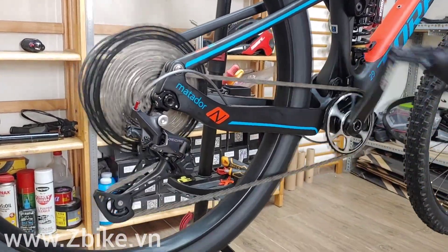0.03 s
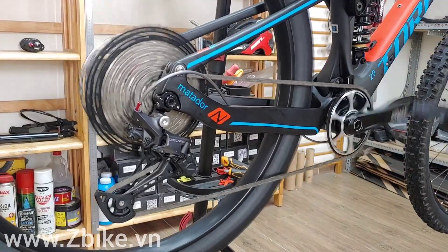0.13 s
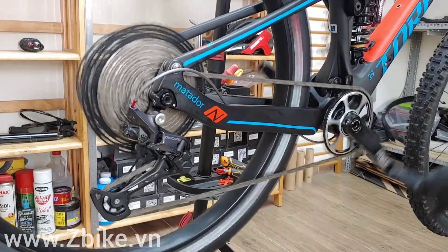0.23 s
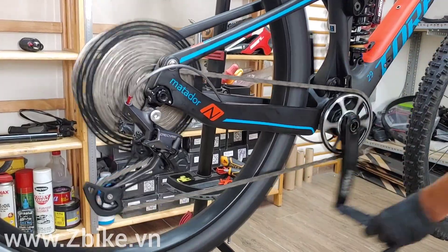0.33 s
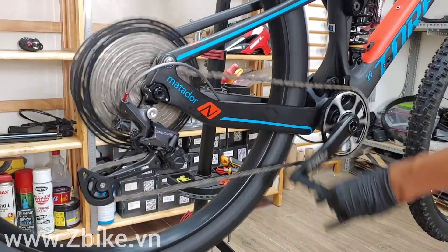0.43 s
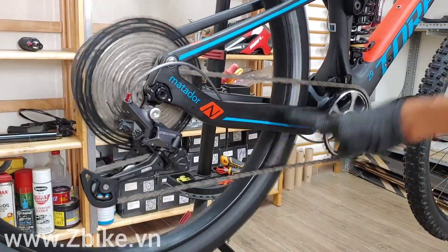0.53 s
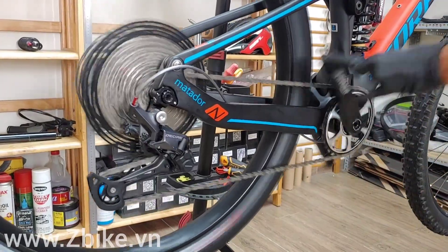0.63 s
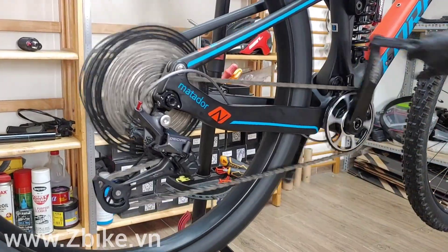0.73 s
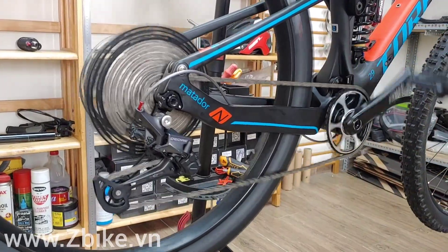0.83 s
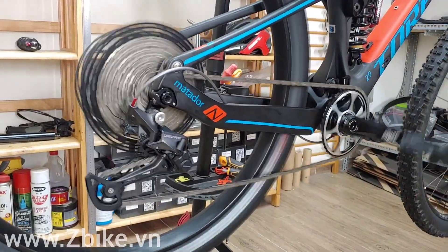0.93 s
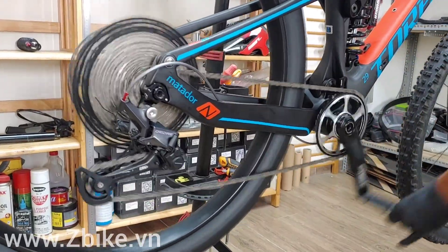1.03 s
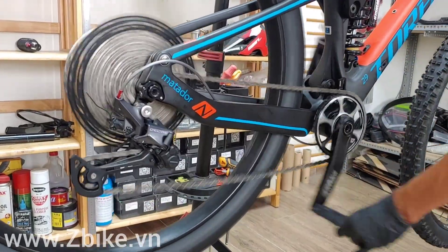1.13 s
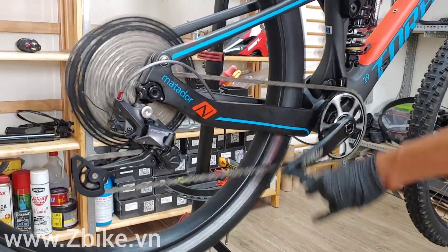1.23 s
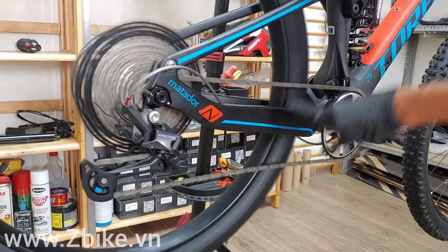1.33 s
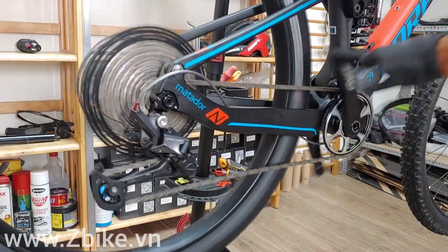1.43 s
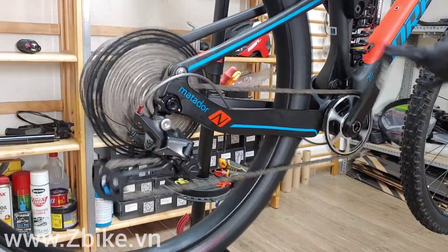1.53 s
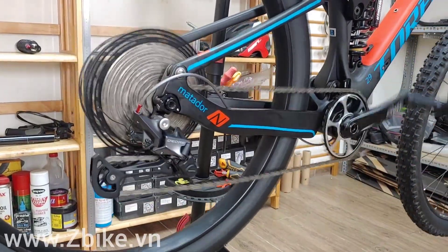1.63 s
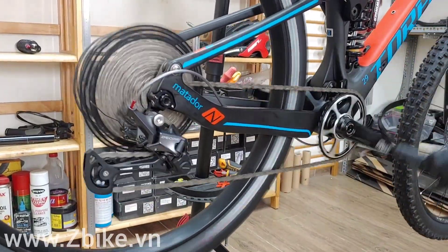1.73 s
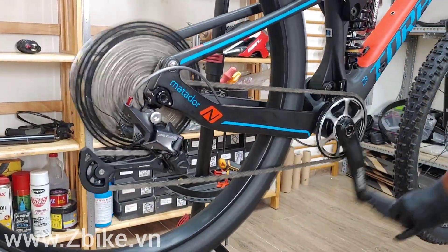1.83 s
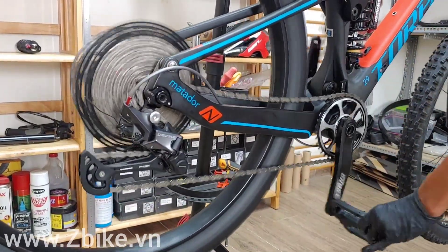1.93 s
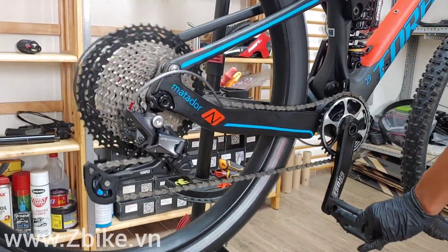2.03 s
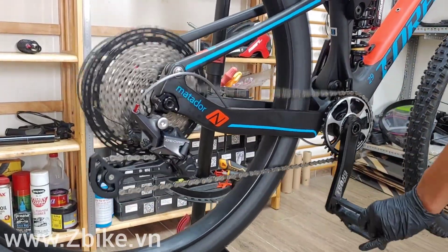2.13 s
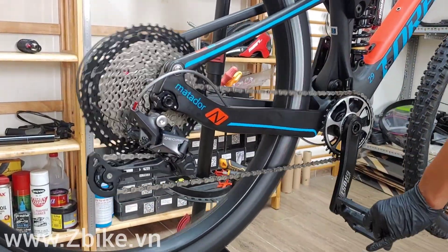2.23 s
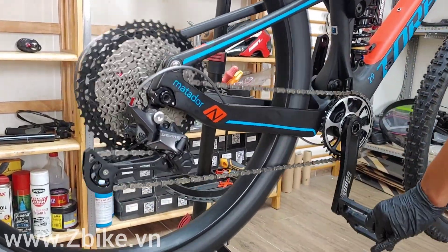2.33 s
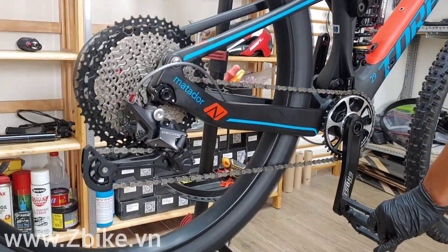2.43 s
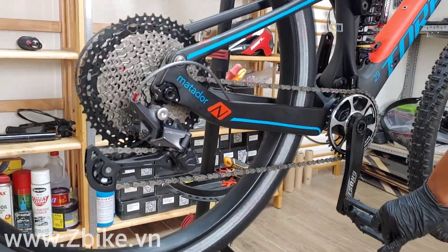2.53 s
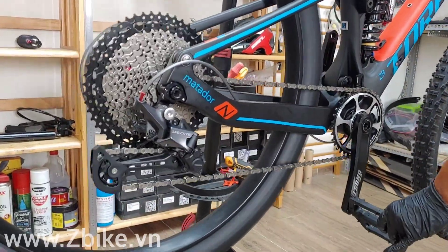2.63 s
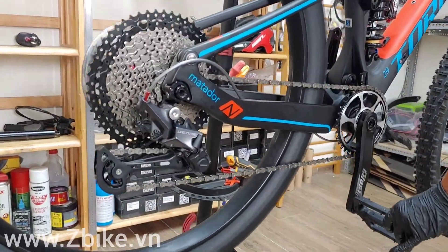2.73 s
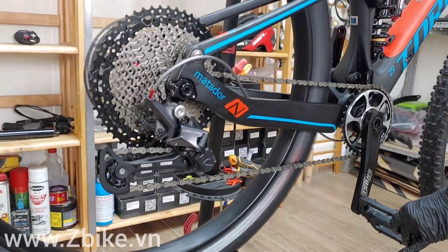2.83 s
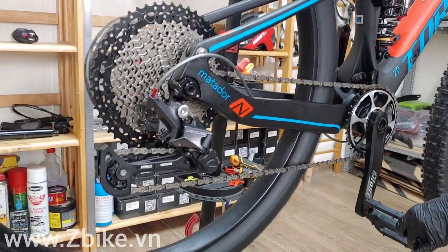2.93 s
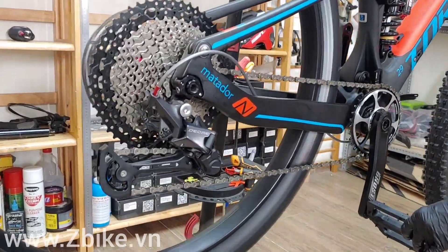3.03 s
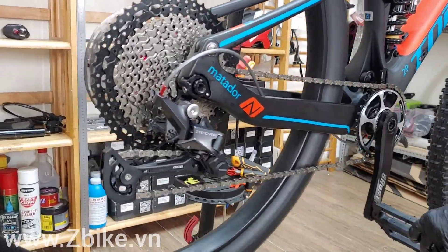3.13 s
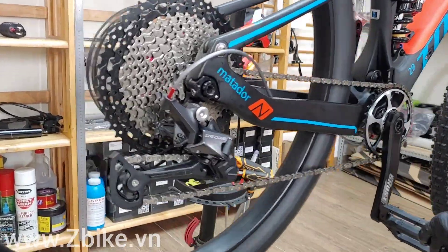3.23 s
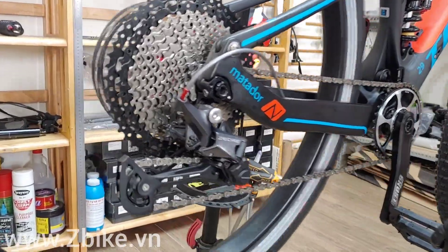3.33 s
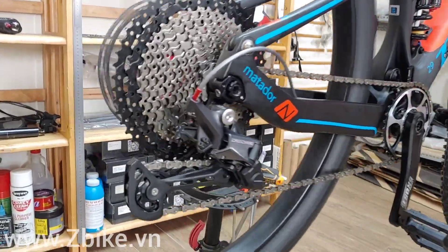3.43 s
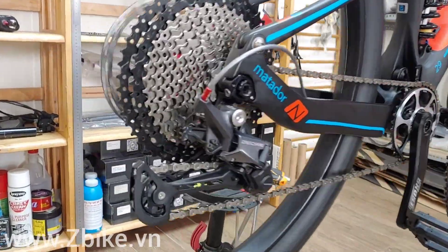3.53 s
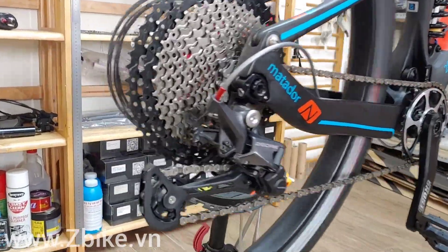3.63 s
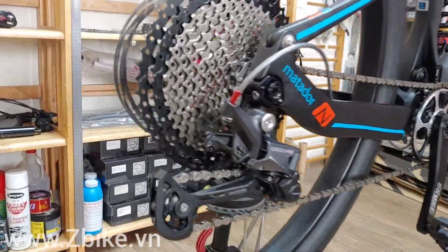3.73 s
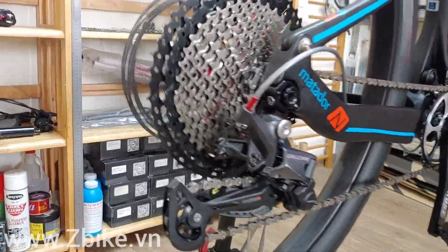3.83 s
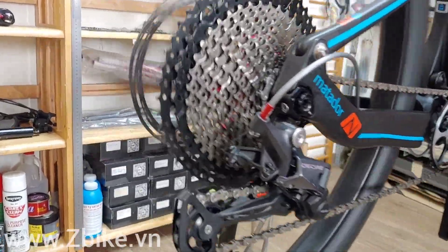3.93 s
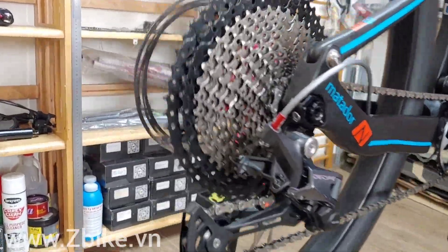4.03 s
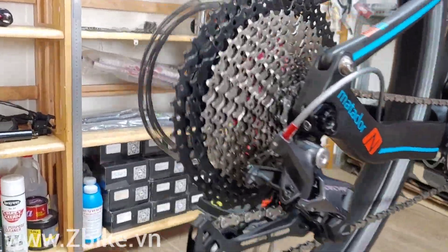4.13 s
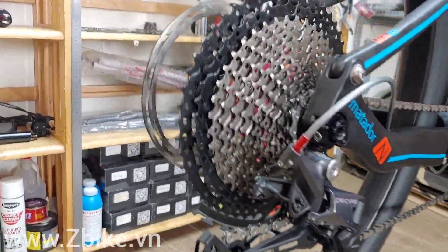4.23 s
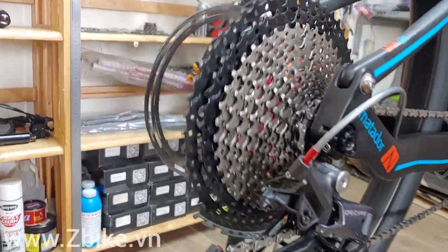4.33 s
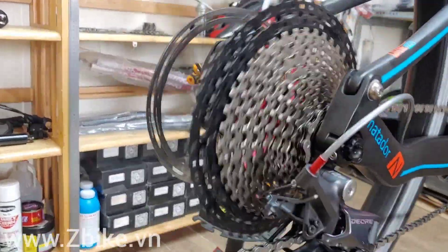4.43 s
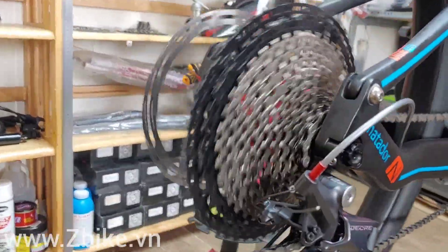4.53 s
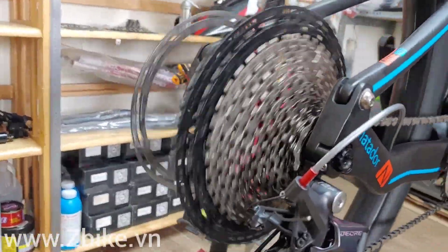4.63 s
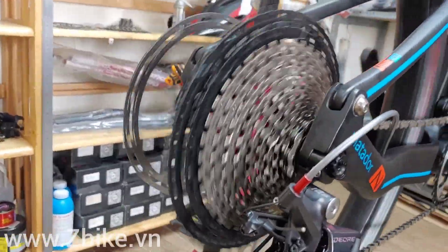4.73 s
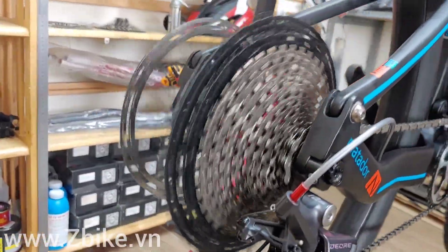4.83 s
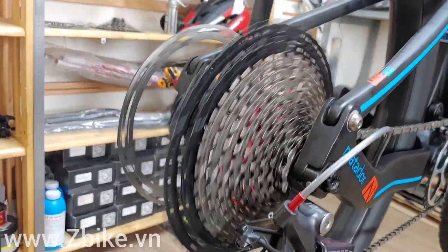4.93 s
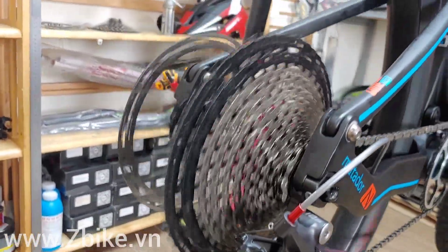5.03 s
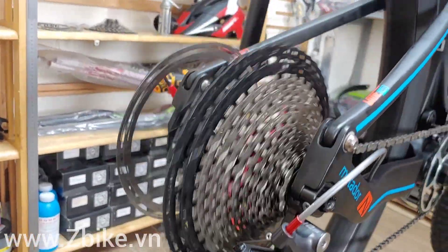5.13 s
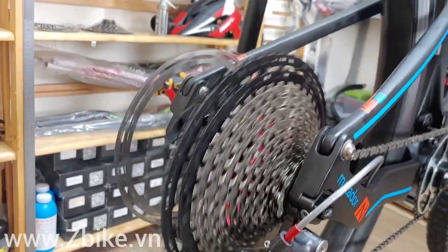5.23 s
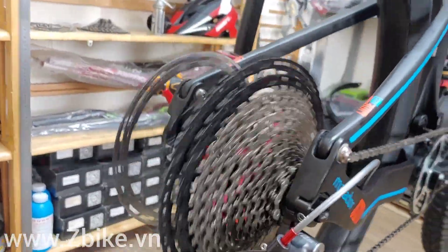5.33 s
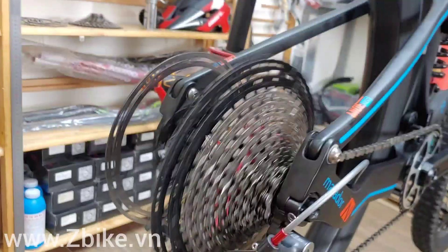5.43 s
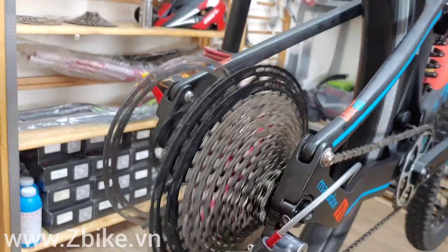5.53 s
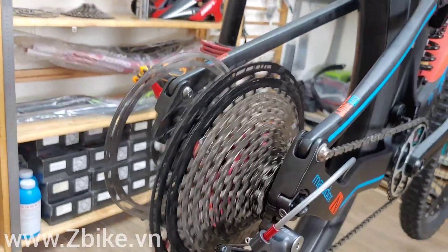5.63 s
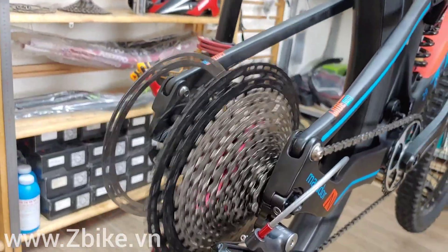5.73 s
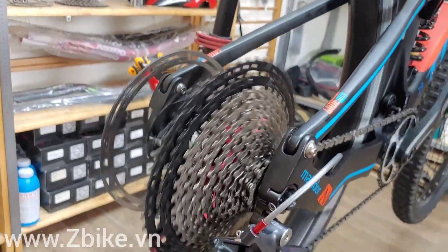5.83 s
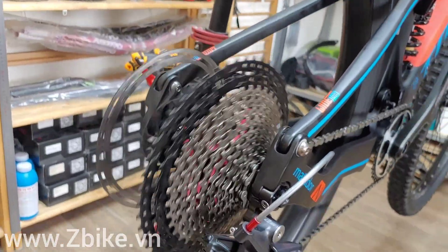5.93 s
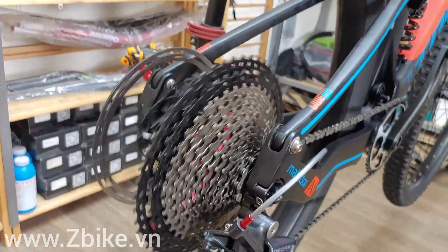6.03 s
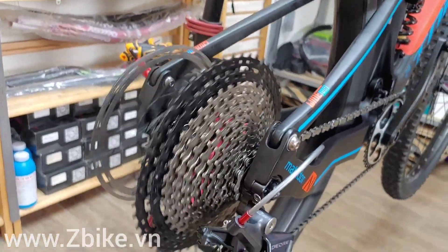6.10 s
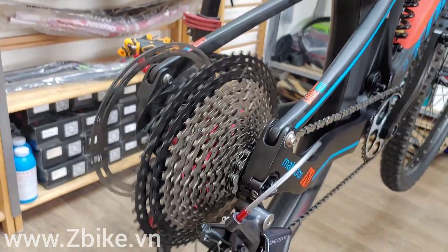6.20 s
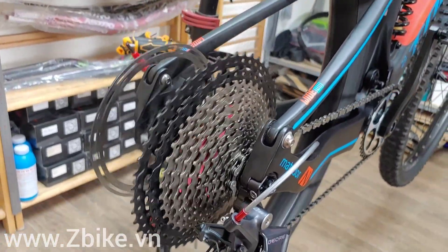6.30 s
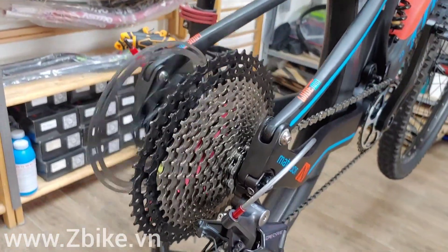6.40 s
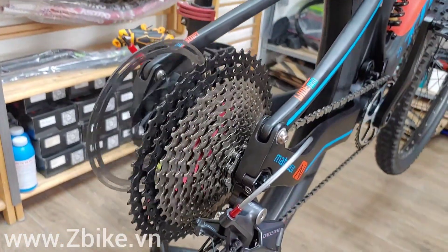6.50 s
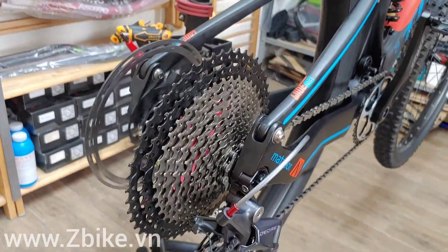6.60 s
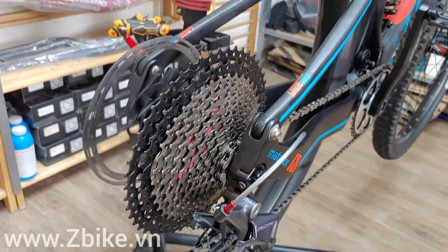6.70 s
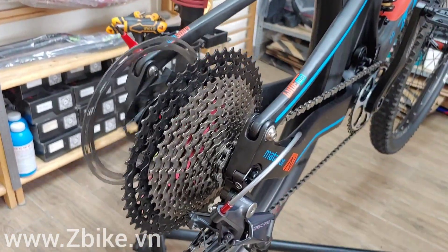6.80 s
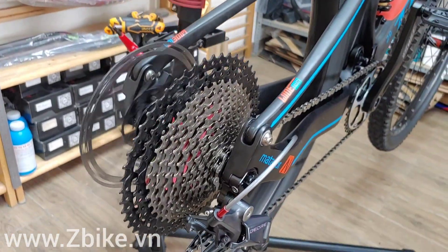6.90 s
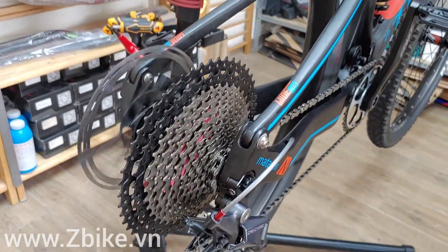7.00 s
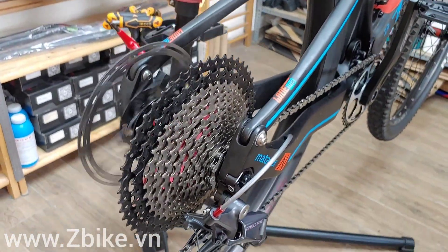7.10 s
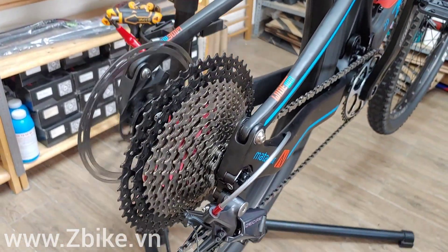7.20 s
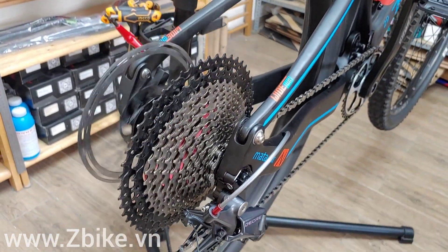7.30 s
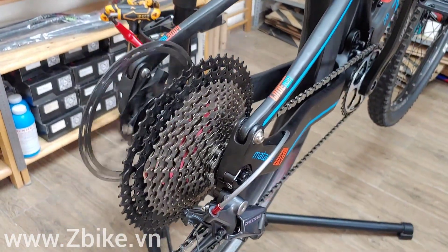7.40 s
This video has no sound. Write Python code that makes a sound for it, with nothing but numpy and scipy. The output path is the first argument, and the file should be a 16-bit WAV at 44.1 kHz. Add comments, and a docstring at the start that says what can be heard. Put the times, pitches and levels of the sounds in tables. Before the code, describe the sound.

Cranked bike drivetrain ticks, slaps and clunks for two seconds before the wheel coasts with a loud, steady metallic ratchet buzz approaching the microphone.

```python
"""A chain clatters across sprockets, twice with a clunk that rings; then a freehub buzzes as its wheel spins on.
A mountain bike hangs in a work stand in a small shop. Chain noise is coloured noise bursts and clicks;
the frame is a sum of decaying sines. Pawl impulses excite steel, hub and wheel, faster when the cassette
is turned backwards. The microphone moves in, and its gain control ducks the low hum of the room."""
import sys
import numpy as np
from scipy import signal
from scipy.fft import rfft, irfft
from scipy.io import wavfile
from scipy.ndimage import uniform_filter1d, minimum_filter1d

SR = 44100
rng = np.random.default_rng(int(sys.argv[2]) if len(sys.argv) > 2 else 0)


def waveform_to_disk(signal):
    """Save audio, clipped to [-1, 1], as 16-bit WAV at the path in sys.argv[1]."""
    frames = np.transpose(np.atleast_2d(signal))
    scaled = np.clip(frames, -1, 1) * 32767
    samples = np.round(scaled).astype(np.int16)
    wavfile.write(sys.argv[1], SR, samples)


N = 328978
TIME = np.arange(N) / SR

# derailleur jolts to frame and stand: (time [s], frame level [dB], stand thump level [dB])
CLUNKS = [(.478, -19.5, -8.5), (1.125, -55, -18), (1.633, -13, -29)]
# chain slap spectrum: (frequency [Hz], level [dB])
SLAP_SPECTRUM = [(300, -29.5), (850, -8), (1300, 6.5), (1600, 2), (2000, 3), (2600, 4), (3100, -6),
                 (4000, -2.5), (5500, -11), (8000, -29)]
# link jingle spectrum: (frequency [Hz], level [dB])
JINGLE_SPECTRUM = [(4000, -23), (6200, -11.5), (7000, -1), (7600, 2.5), (8200, -1), (9000, -9.5),
                   (11000, -22)]
# dull thud spectrum: (frequency [Hz], level [dB])
THUD_SPECTRUM = [(60, -19), (120, -13), (200, -8.5), (280, -6.5), (370, 0), (520, -3.5), (750, -2.5),
                 (1000, -7.5), (5000, -39)]
# microphone to hub: (time [s], distance [m])
DISTANCE = [(2.8, 0.91), (3.6, 0.43), (4.6, 0.4), (5.8, 0.2), (7.45, 0.18)]

FREEWHEEL_S = 1.959  # cranks stop, pawls begin to slip
FIRST_TEETH_PER_S, WHEEL_TEETH_PER_S = 33, 218.3


def from_db(db):
    """Decibels to amplitude gain."""
    return 10 ** (np.asarray(db) / 20)


def in_time(rows):
    """Each column of a table interpolated at every sample."""
    s, *columns = np.transpose(rows)
    return [np.interp(TIME, s, c) for c in columns]


def at_hz(points, hz):
    """A table interpolated on a log-frequency axis."""
    table_hz, values = np.transpose(points)
    return np.interp(np.log(hz + 1), np.log(table_hz), values)


def unit(x):
    """Scale to an energy of one."""
    return x / np.sqrt(np.sum(x ** 2, axis=-1, keepdims=True) + 1e-20)


def pan(db):
    """Left and right gains for a left-minus-right difference in dB."""
    return from_db(np.array([[db], [-db]]) / 2)


def drift(rate_hz):
    """Normal random knots of unit spread, joined by straight lines."""
    knots = rng.standard_normal(int(N / SR * rate_hz) + 2)
    return np.interp(TIME * rate_hz, np.arange(len(knots)), knots)


def through(x, response):
    """Convolve with an impulse response."""
    return signal.oaconvolve(np.atleast_2d(x), np.atleast_2d(response), axes=-1)[:, :N]


def colour(x, spectrum, size=4096):
    """Minimum-phase filter that keeps the power of white input."""
    log_gain = np.log(from_db(at_hz(spectrum, np.arange(size // 2 + 1) * SR / size)))
    cepstrum = irfft(log_gain)
    # fold the cepstrum onto positive time: causal
    cepstrum[1:size // 2] *= 2
    cepstrum[size // 2 + 1:] = 0
    return through(x, unit(irfft(np.exp(rfft(cepstrum)))))


def resonance(x, hz, width_hz):
    """Two-pole resonance with a peak gain of one."""
    r = np.exp(-np.pi * width_hz / SR)
    zeros = np.array([1, 0, -1]) * (1 - r * r) / 2
    poles = [1, -2 * r * np.cos(2 * np.pi * hz / SR), r * r]
    return signal.lfilter(zeros, poles, x + 1e-18)


def clicks(times_s, sizes):
    """Single-sample impulses."""
    at = np.round(times_s * SR).astype(int)
    inside = (at >= 0) & (at < N)
    return np.bincount(at[inside], sizes[inside], N)


def shop(room_db, early_db, early_s, alike_hz=650):
    """Direct sound, scatter from bike and shelves, and a tail alike at both ears only in the bass."""
    # decay time of the shop: (frequency [Hz], T60 [s])
    room_t60 = [(100, 0.075), (400, 0.6), (1500, 0.43), (4000, 0.65), (8000, 0.36), (15000, 0.073)]
    t, tail = TIME[:SR], 0
    edges_hz = np.geomspace(50, 18000, 11)
    for low, high in zip(edges_hz, edges_hz[1:]):
        hz = np.sqrt(low * high)
        alike = 1 / (1 + (hz / alike_hz) ** 2)
        common = np.sqrt(alike) * rng.standard_normal(SR)
        noise = common + np.sqrt(1 - alike) * rng.standard_normal((2, SR))
        band_filter = signal.butter(2, [low, high], "band", fs=SR, output="sos")
        tail = tail + signal.sosfilt(band_filter, noise) * 1000 ** (-t / at_hz(room_t60, hz))
    direct = t == 0
    early = from_db(early_db) * unit(tail * np.exp(-t / early_s))
    late = from_db(room_db) * unit(tail * (t > early_s))
    return unit(direct + early + late)


def room_hum(hum_hz=74.3, hum_db=-45):
    """A low sine hum whose pitch and level wander slightly."""
    level = np.sqrt(2) * from_db(hum_db + 0.67 * drift(5.7))
    phase = 2 * np.pi * np.cumsum(hum_hz + .5 * drift(4.85)) / SR
    return level * np.sin(phase) * pan(3.2)


def air_and_wheel_rush(air_db=-47.5, rush_at_1m_db=-60.5):
    """Dull room noise plus the rush of the wheel, which grows as 1 / distance; partly alike at both ears."""
    # room noise spectrum: (frequency [Hz], level [dB])
    air_spectrum = [(20, -23), (50, -4.5), (110, 0), (200, -8.5), (400, -7.5), (900, -12.5), (3000, -18.5)]
    metres, = in_time(DISTANCE)
    noise = rng.standard_normal(N) + 0.65 * rng.standard_normal((2, N))
    level = np.hypot(from_db(air_db), from_db(rush_at_1m_db) / metres)
    return level * colour(noise, air_spectrum) * pan(3.2)


def running_chain(rustle_db=-40, scrape_db=-52, rumble_db=-51):
    """The moving chain rustles through the pulleys and the cranks rumble: noise until the cranks stop."""
    noise = rng.standard_normal(N) * (TIME < FREEWHEEL_S)
    rustle = from_db(rustle_db) * colour(noise, JINGLE_SPECTRUM)
    scrape = from_db(scrape_db) * colour(noise, SLAP_SPECTRUM)
    rumble = from_db(rumble_db) * colour(noise, THUD_SPECTRUM) * pan(1.4)
    return rustle + scrape + rumble


def roller_ticks(links_per_s=48, tick_db=-36, spread_db=5, late_s=0.0013):
    """While the cranks turn, rollers tick onto the teeth, now and then sharply."""
    # single rollers snapping onto a tooth: (time [s], relative level [dB])
    sharp_ticks = [(0.214, -19.5), (.347, -47), (.388, -30), (0.438, -19.5), (0.833, -15), (1.021, -26.5),
                   (1.449, -20.5), (1.488, -21)]
    when_s = np.arange(0, FREEWHEEL_S, 1 / links_per_s)
    late, size = rng.standard_normal((len(when_s), 2)).T
    rollers = clicks(when_s + late_s * late, from_db(tick_db + spread_db * size))
    s, db = np.transpose(sharp_ticks)
    return from_db(22.5) * colour(rollers + clicks(s, from_db(db)), JINGLE_SPECTRUM)


def rattle(s, db, length_s, grain=1.05):
    """A dense burst of uneven contacts that dies away; dB is its level over 20 ms."""
    t = TIME[:SR // 5]
    contacts = rng.standard_normal(len(t))
    uneven = np.sign(contacts) * np.abs(contacts) ** grain
    burst = unit(uneven * np.exp(-t / max(length_s, .001)))
    return clicks(s + t, burst * from_db(db) * np.sqrt(SR / 50))


def chain_landings():
    """Each landing of the chain slaps, jingles the links and, except at clunks, gives a bright crack."""
    # chain slaps its guides: (time [s], relative level [dB])
    guide_slaps = [(0.06, -19.5), (.172, -23), (.643, -19), (0.789, -23.5), (1.254, -21), (1.428, -26)]
    # links drop onto the next sprocket:
    # (time [s], relative jingle level [dB], relative crack level [dB], rattle time [s])
    shifts = [(0.457, -14, -38, 0.0081), (0.871, -8, -22.5, 0.0046), (1.117, -7, -21, 0.015),
              (1.15, -11, -21.5, 0.034), (1.526, -7.5, -39, 0.0064)]
    # crack spectrum: (frequency [Hz], level [dB])
    crack_spectrum = [(3000, -46), (6000, -10), (9500, 23), (11500, 20), (16000, -3)]
    # landings: (s, jingle dB, slap dB, crack dB, rattle time s)
    landings = [(s, db + 7, db, db - 14, 0.017) for s, db in guide_slaps]
    landings += [(s, db, db - 16.5, crack_db, length_s) for s, db, crack_db, length_s in shifts]
    # each clunk shakes the chain
    landings += [(s, db + 6.5, db + 3, -np.inf, 0.022) for s, db, _ in CLUNKS]
    jingle = sum(rattle(s, db, length_s) for s, db, _, _, length_s in landings)
    slap = sum(rattle(s, db, length_s) for s, _, db, _, length_s in landings)
    crack = sum(rattle(s, db, length_s) for s, _, _, db, length_s in landings)
    slap = from_db(-3.5) * colour(slap, SLAP_SPECTRUM) * pan(2.1)
    jingle = from_db(-6.0) * colour(jingle, JINGLE_SPECTRUM)
    return slap + jingle + from_db(1.5) * colour(crack, crack_spectrum)


def frame_clunks(stand_hz=119, stand_width_hz=55):
    """A dull thud from the derailleur and a low resonant thump from the stand."""
    thud = colour(sum(rattle(s, db, length_s=0.084) for s, db, _ in CLUNKS), THUD_SPECTRUM)
    thump = sum(rattle(s, db, length_s=0.13) for s, _, db in CLUNKS)
    for _ in range(2):
        thump = resonance(thump, stand_hz, stand_width_hz)
    return (thud + from_db(17) * thump) * pan(3.6)


def frame_ring():
    """Frame and spokes ring on after each clunk as decaying sine modes."""
    # frame and wheel modes: (frequency [Hz], relative level [dB], T60 [s])
    frame_modes = [(360, -8, 1.1), (409.4, -17, 2.23), (413.5, -11.5, 1.77), (512, -23, 0.64),
                   (700, -7.5, 0.71), (820, -13.5, 0.5), (1140, -11, 0.26), (1700, -24, 1.06),
                   (2510, -18, 0.69)]
    modes = sum(from_db(db - 60 * TIME / t60_s) * np.sin(2 * np.pi * hz * TIME)
                for hz, db, t60_s in frame_modes)
    s, db, _ = np.transpose(CLUNKS)
    return through(clicks(s, from_db(db)), modes) * pan(6.0)


def tooth_rate(spin_up_s=.05, drag_teeth_per_s2=5.9):
    """Teeth passing per second: exponential onset, then evenly slowing wheel plus backward cassette."""
    # cassette turned backwards: (time [s], added rate [teeth/s])
    backspin_rows = [(2.09, 36), (2.19, 48), (2.27, 22), (2.44, 13), (2.47, 0), (3.56, 0), (4.0, 19),
                     (4.27, 6), (4.4, 14), (4.57, 46), (4.95, 58), (5.28, 45), (5.56, 55), (5.84, 47),
                     (6.03, 31), (6.3, 31), (6.47, 0)]
    t = TIME - FREEWHEEL_S
    backspin, = in_time(backspin_rows)
    slipping = FIRST_TEETH_PER_S * np.exp(np.minimum(t, 1) / spin_up_s)
    return np.minimum(slipping, WHEEL_TEETH_PER_S - drag_teeth_per_s2 * t + backspin)


def pawl_impacts(rate, teeth, bounce_s=.0006, bounce_db=3.5, slow_tooth_power=0.33):
    """Pawls drop off the teeth at set places in the tooth cycle, then bounce at uneven delays and sizes."""
    # pawls: (place in tooth cycle [0-1], hub weight [dB], relative ring level [dB])
    pawls = [(0.0, -2, 0), (.48, -11, -0.5)]
    running = TIME >= FREEWHEEL_S
    drops, bounces = 0, 0
    for place, weight_db, ring_db in pawls:
        when_s = np.interp(np.arange(int(teeth[-1])) + place, teeth[running], TIME[running])
        drops = drops + clicks(when_s, np.full(len(when_s), from_db(weight_db)))
        for size in rng.standard_normal((len(when_s), 2)).T:
            bounce_at_s = when_s + bounce_s * rng.exponential(1, len(when_s))
            bounces = bounces + clicks(bounce_at_s, from_db(ring_db + bounce_db * size))
    strength = np.sqrt(SR / WHEEL_TEETH_PER_S)
    # slow pawls fall their whole height: they ring the steel more and shake the hub less
    pace = np.clip(rate / rate[-1], FIRST_TEETH_PER_S / WHEEL_TEETH_PER_S, 1) ** slow_tooth_power
    return drops * strength * pace, bounces * strength / pace / 2


def steel_ring(bounces, cut_hz=6050, modes_db=10, snap_db=-1):
    """Bounces excite the ratchet's steel resonances and a broad snap."""
    # steel resonances: (frequency [Hz], width [Hz], level [dB], left minus right [dB])
    steel_modes = [(6650, 760, -18, 1), (7330, 420, -11, 13), (7650, 260, -3, 14), (8314, 64, 5, -16.5),
                   (8610, 550, -10.5, -4.5), (9140, 112, 0.5, -6.5), (9330, 1230, -17.5, -12.5),
                   (12200, 200, -53, -12), (13900, 330, -27, 16)]
    # snap spectrum: (frequency [Hz], level [dB])
    snap_spectrum = [(5000, -6), (6200, -0.5), (7500, 14), (10500, -0.5), (12800, -1.5), (16000, -3)]
    modes = 0
    for k, (hz, width_hz, db, side_db) in enumerate(steel_modes):
        modes = modes + (-1) ** k * from_db(db) * pan(side_db) * resonance(bounces, hz, width_hz)
    ring = from_db(modes_db) * modes + from_db(snap_db) * colour(bounces, snap_spectrum)
    # pawls are too small to radiate below their lowest resonance
    return signal.sosfilt(signal.butter(8, cut_hz, "high", fs=SR, output="sos"), ring)


def flutter(drops):
    """The push of the pawls changes over a few teeth, which broadens each partial of the buzz."""
    band_filter = signal.butter(3, [10, 38], "band", fs=SR, output="sos")
    push = signal.sosfilt(band_filter, rng.standard_normal(N))
    return drops * (.72 + .68 * push / push.std())


def radiation(teeth):
    """Gains of steel, shell and wheel; each grows by its own power of 1 / distance."""
    metres, = in_time(DISTANCE)
    # the steel ring weakens as the microphone goes off its beam
    off_beam_db = 8.5 * np.clip((TIME - 5.88) / .08, 0, 1)
    # hub swells once per 57-tooth turn of the ratchet, most at tooth 6.9
    swell_db = 2.5 * np.cos(2 * np.pi * (teeth - 6.9) / 57)
    # shell rings harder as the cassette jerks to a halt
    halt_db = 7 * np.exp(-np.abs(TIME - 2.06) / .035)
    steel = from_db(-4.5 - off_beam_db + 1.23 * drift(20)) / metres ** 0.67
    shell = from_db(-22.5 + swell_db + halt_db) / metres ** 0.99
    wheel = from_db(-45 + swell_db) / metres ** 1.464
    return steel, shell, wheel


def scattered(x, count=7):
    """Reflections change as the microphone moves: each place on its way fades into the next."""
    places_s, step_s = np.linspace(FREEWHEEL_S, TIME[-1], count, retstep=True)
    fades = np.cos(np.pi / 2 * np.clip((TIME - places_s[:, None]) / step_s, -1, 1))
    return sum(through(x * fade, shop(room_db=13, early_db=8.5, early_s=0.0023)) for fade in fades)


def freehub(tap_db=-13):
    """Pawl drops tap the hub and shake shell and wheel; their bounces set the steel ringing."""
    # pawl tap spectrum: (frequency [Hz], level [dB])
    tap_spectrum = [(900, -64), (2000, -39.5), (2800, 0.5), (3300, -7), (3750, -3.5), (4250, -1.5),
                    (5400, -4), (6500, 0), (9000, -9.5)]
    # hub shell spectrum: (frequency [Hz], level [dB])
    shell_spectrum = [(700, -61.5), (2050, -18.5), (2280, -13), (2560, -3.5), (2680, -5.5), (2900, -15),
                      (3300, -22.5), (3780, -10.5), (4000, -21.5), (6000, -24)]
    # wheel spectrum: (frequency [Hz], level [dB])
    wheel_spectrum = [(450, -58), (750, -5.5), (860, -9), (1050, -8.5), (1300, 0.5), (1650, 9), (2000, -15),
                      (2400, 16.5), (4000, -27.5)]
    rate = tooth_rate()
    # bearing play lets teeth arrive a little early or late for a few teeth on end
    teeth = np.cumsum(rate * (TIME >= FREEWHEEL_S)) / SR + .004 * drift(50)
    drops, bounces = pawl_impacts(rate, teeth)
    ring = steel_ring(bounces)
    tap = from_db(tap_db) * colour(flutter(drops), tap_spectrum) * pan(0.76)
    shell = colour(flutter(drops), shell_spectrum) * pan(2.3)
    wheel = colour(flutter(drops), wheel_spectrum) * pan(2.2)
    steel_gain, shell_gain, wheel_gain = radiation(teeth)
    # high ring scatters all round the shop; hub buzz arrives more directly
    buzz = steel_gain * tap + shell_gain * shell + wheel_gain * wheel
    near = shop(room_db=-1, early_db=-5, early_s=.005)
    return scattered(steel_gain * ring) + through(buzz, near)


def scene():
    """Room noise, drivetrain and freehub in the shop."""
    background = room_hum() + air_and_wheel_rush()
    drivetrain = running_chain() + chain_landings() + frame_clunks()
    drivetrain = through(drivetrain, shop(room_db=14.0, early_db=12.0, early_s=0.0038))
    ticks = through(roller_ticks(), shop(room_db=8, early_db=-1, early_s=0.00085))
    return background + drivetrain + ticks + frame_ring() + freehub()


def gain_control(x, threshold_db=-8.5, release_db_per_s=50):
    """Quickly turns down what exceeds the threshold and recovers slowly, so the buzz ducks the room."""
    power = uniform_filter1d(np.mean(x ** 2, axis=0), size=801, origin=400)
    level_db = 10 * np.log10(np.maximum(power, 1e-12))
    recovery_db = release_db_per_s * TIME
    excess_db = np.maximum(level_db - threshold_db, 0)
    # running maximum with a linear release
    cut_db = np.maximum.accumulate(excess_db + recovery_db) - recovery_db
    return x * from_db(-uniform_filter1d(cut_db, size=221))


def record(dry, ceiling=0.94, cutoff_hz=15800):
    """Gain control, a fast look-ahead peak limiter, then a steep low-pass."""
    levelled = gain_control(dry)
    allowed = ceiling / np.maximum(np.abs(levelled), ceiling)
    gain = minimum_filter1d(allowed, size=121)
    gain = uniform_filter1d(uniform_filter1d(gain, size=61), size=61)
    low_pass = signal.ellip(12, .1, 70, cutoff_hz, fs=SR, output="sos")
    return signal.sosfilt(low_pass, levelled * gain)


dry = scene()
out = record(dry)
waveform_to_disk(out)
```